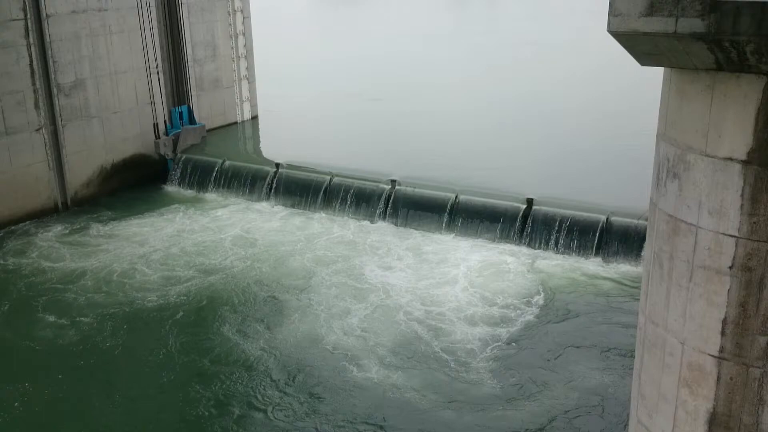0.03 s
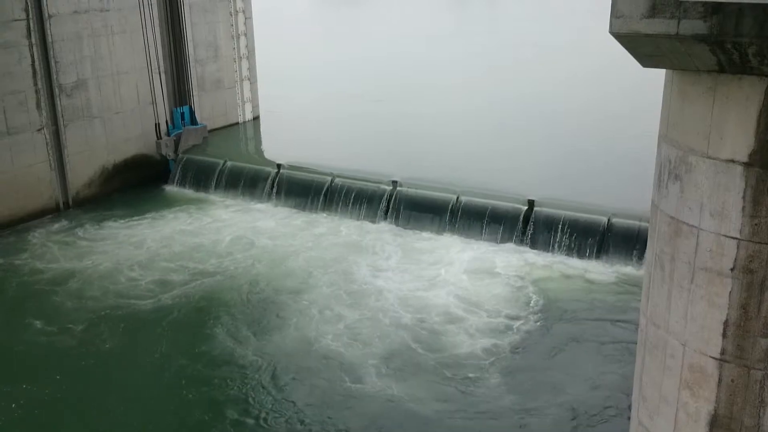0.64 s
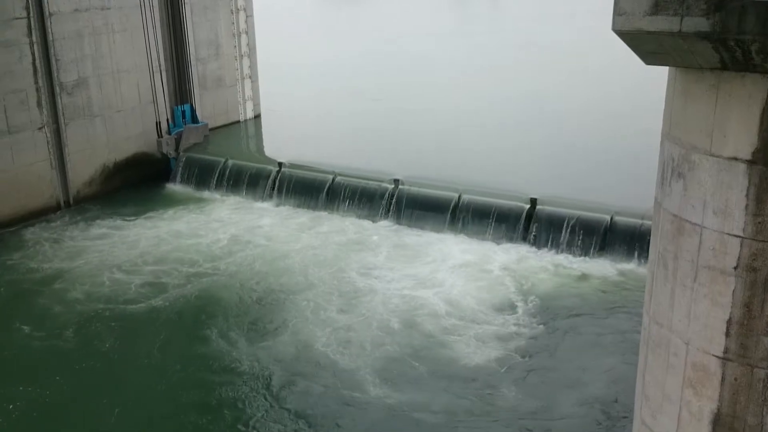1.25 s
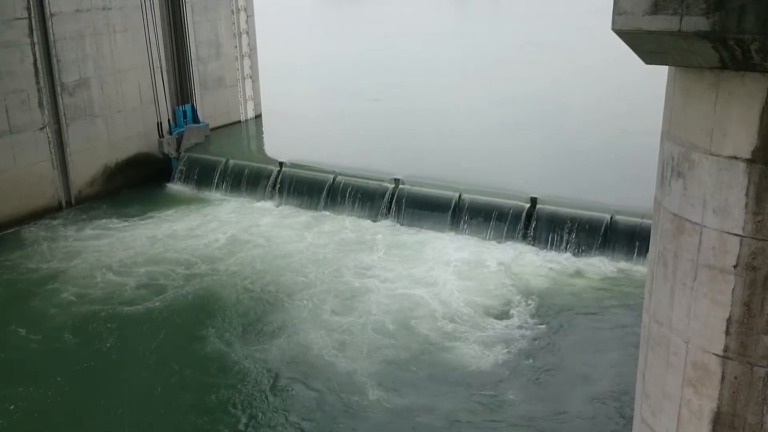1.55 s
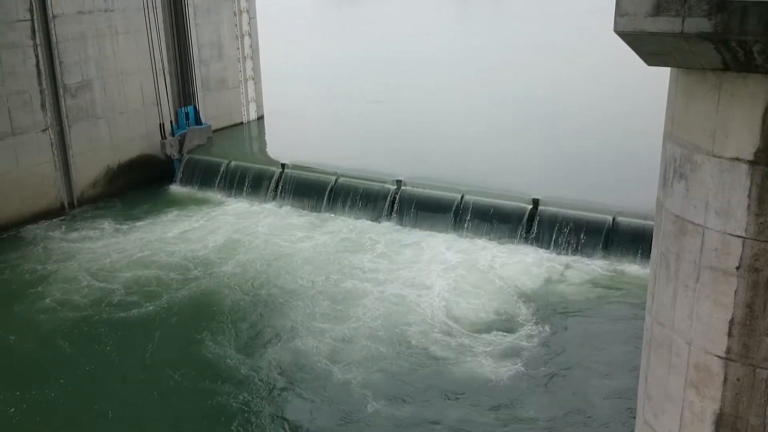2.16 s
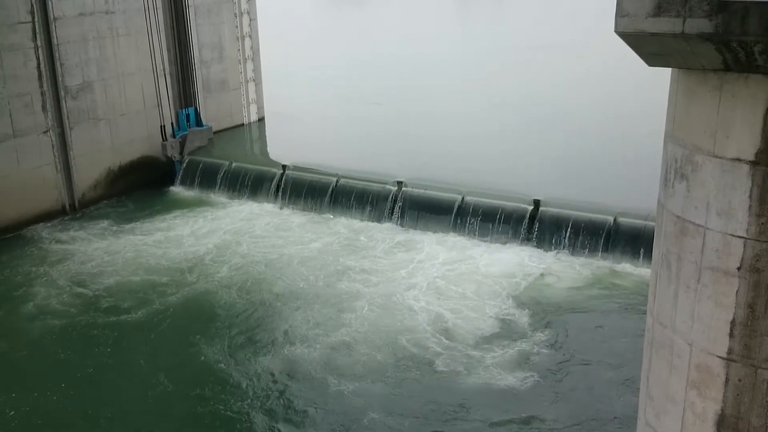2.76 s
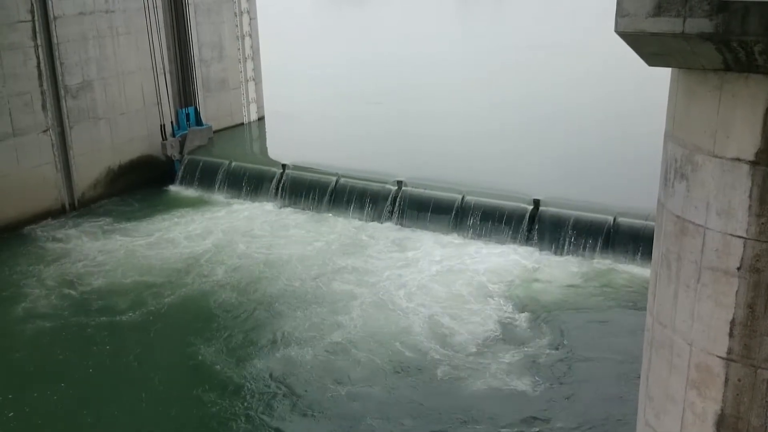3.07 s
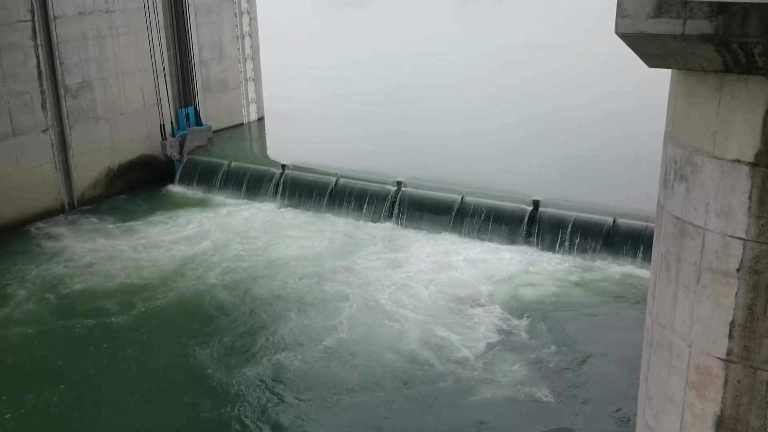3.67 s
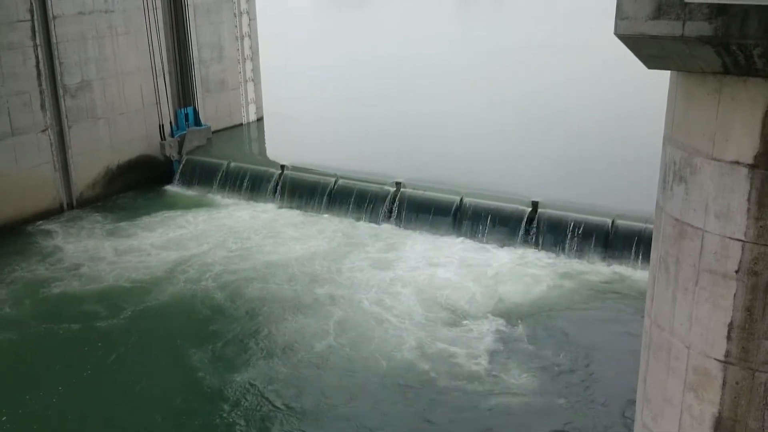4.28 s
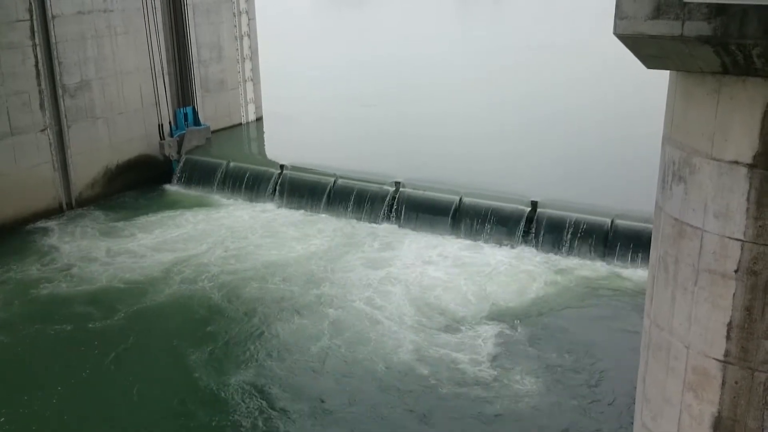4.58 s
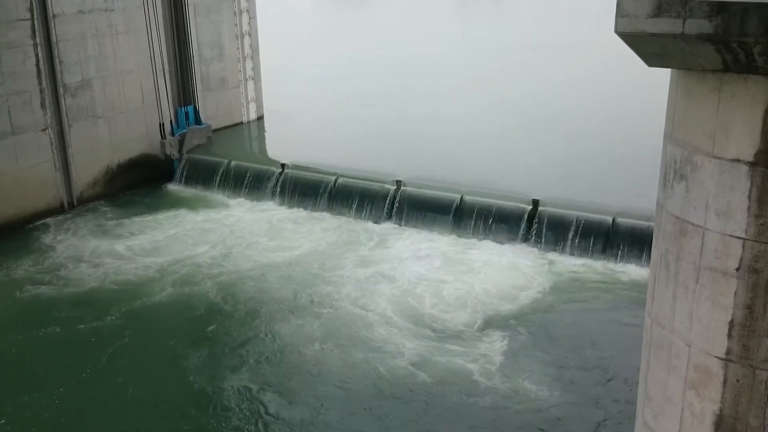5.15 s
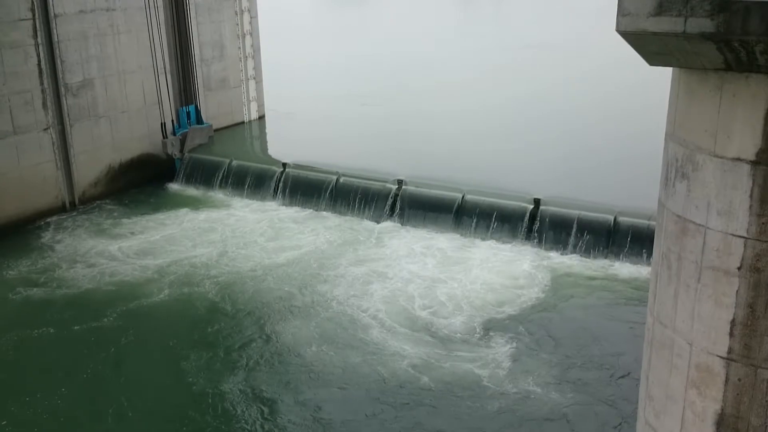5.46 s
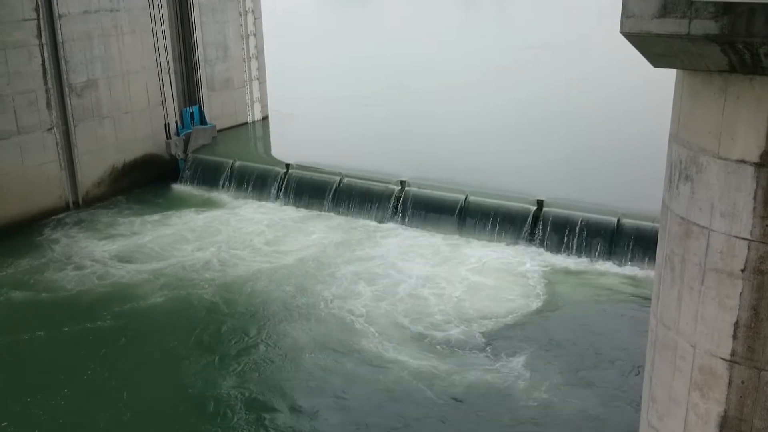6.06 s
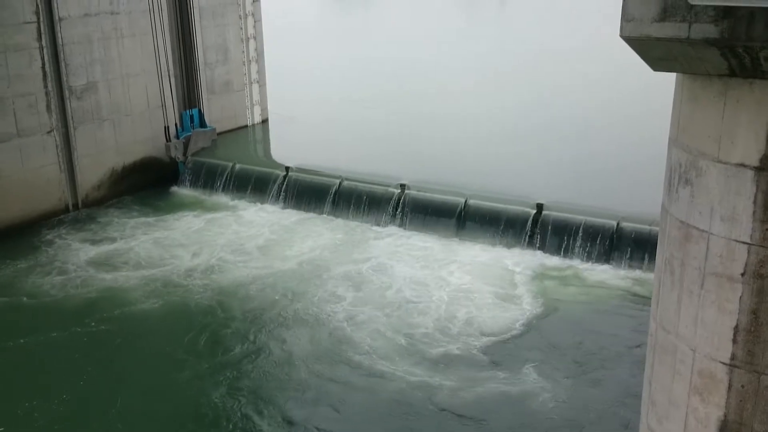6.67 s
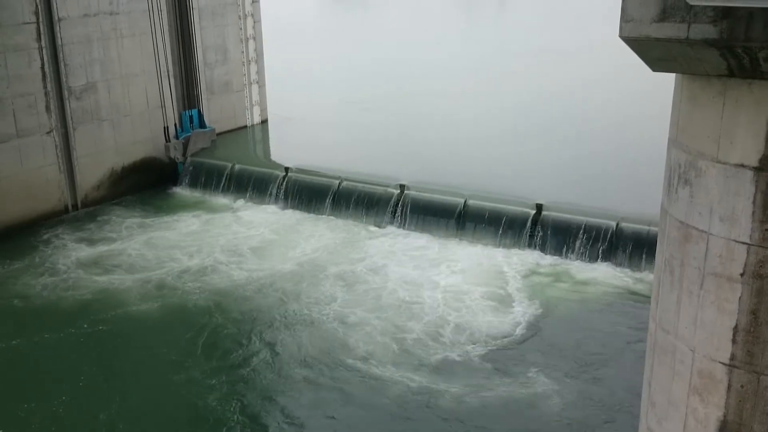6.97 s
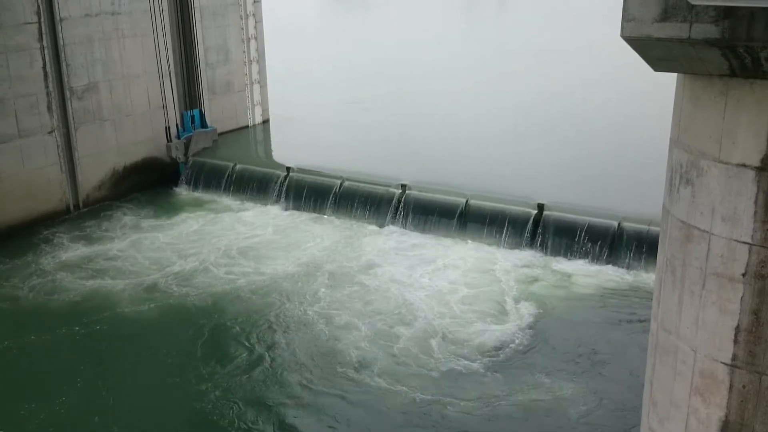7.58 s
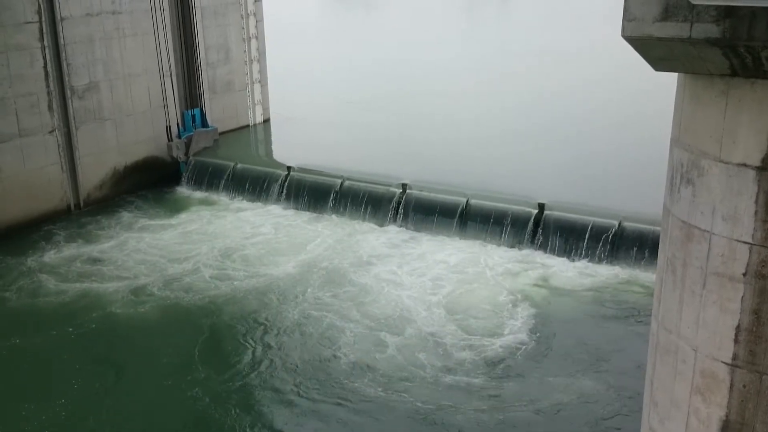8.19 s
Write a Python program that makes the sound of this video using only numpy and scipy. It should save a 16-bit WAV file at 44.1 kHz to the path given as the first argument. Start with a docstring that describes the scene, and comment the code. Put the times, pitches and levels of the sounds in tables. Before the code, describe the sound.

River water falling over a weir into a foaming pool fades in and carries on as a broad, even rush. It blends low churning, fine bubbling and a light hiss of spray, with a few small surges. Underneath, an unsteady low hum rises and sinks. The microphone is above the pool, giving a centred bass and a wide, slightly ringing hiss.

```python
"""A steady rush of water fades in: a river pours over a weir gate and churns in the pool below.
Clouds of trapped air rumble under the plunge, bubbles ring in the foam and spray hisses.
A low hum comes and goes. All is heard from above through two microphone ports that colour the treble."""
import sys
import numpy as np
from scipy import signal
from scipy.fft import rfft, irfft, next_fast_len
from scipy.io import wavfile

SR = 44100
rng = np.random.default_rng(int(sys.argv[2]) if len(sys.argv) > 2 else 0)


def wav_record(signal):
    """Record a signal, one row per channel, as 16-bit PCM in the file named by sys.argv[1]."""
    frames = np.transpose(np.atleast_2d(signal))
    bounded = np.clip(frames, -1, 1)
    # unit amplitude maps onto the largest positive 16-bit level
    quanta = np.round(bounded * 32767).astype(np.int16)
    wavfile.write(sys.argv[1], SR, quanta)


N = 367353
CUTOFF_HZ = 15800

# spectrum of the falling water: f/Hz, relative density/dB
WATER_SPECTRUM = [(22, -41), (45, -15), (56, -6.5), (80, -0.1), (140, -3.5), (180, -0.9), (300, 1.0),
                  (410, -2), (520, -7), (850, -5), (1300, -10), (2600, -12), (4200, -17.5), (11000, -27.5),
                  (16000, -31)]
# phase lead of the left port: f/Hz, phase/rad
LEFT_LEAD = [(40, 1), (100, .5), (380, 0), (550, -0.5), (850, 0), (1200, -2.0), (1600, -4), (2500, -5.5),
             (5500, -12.5), (9000, -21)]


def from_db(db):
    """Decibels to gain."""
    return 10 ** (np.asarray(db) / 20)


def unit_rms(x):
    """Scale to rms 1."""
    return x / np.sqrt(np.mean(x ** 2) + 1e-20)


def per_sample(points):
    """Read a (t/s, value) table at every sample."""
    return np.interp(np.arange(N) / SR, *np.transpose(points))


def at_hz(points, hz):
    """Read a (f/Hz, value) table on a log-frequency axis."""
    known_hz, values = np.transpose(points)
    return np.interp(np.log(hz + 1e-9), np.log(known_hz), values)


def filtered(x, response):
    """Apply the frequency response response(hz)."""
    size = next_fast_len(N + SR // 4, True)
    return irfft(rfft(x, size) * response(np.fft.rfftfreq(size, 1 / SR)), size)[..., :N]


def drift(per_s):
    """Random curve of rms 1 with per_s breakpoints a second."""
    steps = rng.standard_normal(2048)
    return unit_rms(np.interp(np.arange(N) / SR * per_s, np.arange(len(steps)), steps))


def diffuse_noise():
    """White noise from a wide pool at two close ports: bass alike, treble different."""
    # coherence of the ports: f/Hz, coherence/1
    coherence = [(30, 0.4), (80, 0.8), (190, 0.98), (400, 0.92), (590, 0.5), (800, 0.84), (1100, 0.25),
                 (2400, 0.13), (3400, 0.12), (5500, 0.08), (9000, .02)]
    left, independent = rng.standard_normal((2, N))
    shared = filtered(left, lambda hz: at_hz(coherence, hz) * np.exp(-1j * at_hz(LEFT_LEAD, hz)))
    right_only = filtered(independent, lambda hz: np.sqrt(1 - at_hz(coherence, hz) ** 2))
    return np.array([left, shared + right_only])


def hum(tone_hz=61.9, waver_hz=0.7, throb_db=1.0, rumble_db=-12, rumble_hz=44, width_oct=0.41):
    """Unsteady low tone, perhaps the gate trembling in the flow, over a rumble that swells with it."""
    # hum envelope: t/s, level/dB
    envelope = [(1.2, -42), (1.85, -37.3), (3.1, -44), (5.05, -41), (5.6, -50), (7.2, -56), (7.58, -38),
                (7.85, -49.5)]
    phase = 2 * np.pi * np.cumsum(tone_hz + waver_hz * drift(5.4)) / SR
    tone = np.sqrt(2) * np.sin([phase + at_hz(LEFT_LEAD, tone_hz), phase])
    tone *= from_db(throb_db * drift(8.7))
    rumble = filtered(diffuse_noise(),
                      lambda hz: np.exp(-(np.log2(hz / rumble_hz + 1e-9) / width_oct) ** 2))
    balance = from_db([[-3.0], [0.4]])   # left, right
    return (tone + from_db(rumble_db) * unit_rms(rumble)) * from_db(per_sample(envelope)) * balance


def bubbles(per_s=700, cycles_to_60db=10.6, spread_db=4.0, low_hz=450, high_hz=9000, sizes=28):
    """Single bubbles and drops near the surface ring briefly, scattered across the pool."""
    out = np.zeros((2, N))
    for hz in np.geomspace(low_hz, high_hz, sizes):
        draws = rng.random((3, 1500))
        wait, strength = -np.log(1 - draws[:2])   # exponential
        pan = draws[2]
        onsets = (np.cumsum(wait) * sizes / per_s * SR).astype(int)
        height = from_db(spread_db * np.minimum(strength, 4) + at_hz(WATER_SPECTRUM, hz)) * np.sqrt(hz)
        pops = np.zeros((2, N))
        pops[:, onsets[onsets < N]] = (height * np.sqrt([pan, 1 - pan]))[:, onsets < N]
        decay = np.exp(-np.log(1000) * hz / (cycles_to_60db * SR))
        step_rad = 2 * np.pi * hz / SR
        feedback = [1, -2 * decay * np.cos(step_rad), decay ** 2]
        out += signal.lfilter([0, np.sin(step_rad)], feedback, pops + 1e-18)
    return unit_rms(out)


def plunge(boom_heave_db=0.4, roar_heave_db=0.5, heaves_per_s=3.96, rise_share=0.4):
    """Level curves of the water's boom and roar in dB: random heave plus brief swells."""
    # brief swells: peak t/s, length/s, boom lift/dB, roar lift/dB
    swells = [(1.44, .15, 3.5, -2.5), (1.763, .2, 2.5, 4), (2.9, .9, 0, 1.5), (4.447, 0.14, 3, 3),
              (7.21, 0.22, 4.5, -1.5), (7.57, 0.18, 7, 1), (7.91, 0.14, 5, -1)]
    boom_db = boom_heave_db * drift(heaves_per_s)
    roar_db = roar_heave_db * drift(heaves_per_s)
    for peak_s, length_s, boom_lift_db, roar_lift_db in swells:
        from_peak = (np.arange(N) / SR - peak_s) / length_s
        swell = np.interp(from_peak, [-rise_share, 0, 1 - rise_share], [0, 1, 0])
        boom_db += boom_lift_db * swell
        roar_db += roar_lift_db * swell
    return boom_db, roar_db


def churn(swells_db, rush_db=-27.5, cloud_hz=400, heave_db=0.4, flicker_db=0.51, surge_db=0.07):
    """Countless bubbles merge into a rush; each octave is one bubble size and also swells on its own."""
    # centres of boom (big air clouds), roar (middling ones) and spray (small bubbles): f/Hz
    swell_hz = [125, 258, 800]
    noise = filtered(diffuse_noise(), lambda hz: from_db(at_hz(WATER_SPECTRUM, hz)) * (hz < CUTOFF_HZ))
    noise = unit_rms(noise)
    surge = drift(19)
    octaves_hz = np.geomspace(31.25, 16000, 10)
    out = np.zeros((2, N))
    for centre_hz, band_gains in zip(octaves_hz, np.eye(len(octaves_hz))):
        band = filtered(noise, lambda hz: at_hz(np.c_[octaves_hz, band_gains], hz))
        weights = [at_hz(np.c_[swell_hz, gains], centre_hz) for gains in np.eye(len(swell_hz))]
        swell_db = sum(weight * (db - db.mean()) for weight, db in zip(weights, swells_db))
        cloud_share = 1 / (1 + (centre_hz / cloud_hz) ** 2)   # clouds heave slowly, spray flickers fast
        slow_db = cloud_share * heave_db * drift(9.9)
        fast_db = (1 - cloud_share) * (flicker_db * drift(30) + surge_db * surge)
        out += band * from_db(rush_db + swell_db + slow_db + fast_db)
    return out


def scene(bubble_re_spray_db=-15):
    """The rush, the bubbles that stand out of it, and the hum."""
    # foam and spray on the pool: t/s, level/dB
    spray = [(1.5, -29), (2.45, -28.5), (3.3, -28.9), (5.5, -29), (8.3, -28.5)]
    spray_db = per_sample(spray)
    boom_db, roar_db = plunge()
    rush = churn([boom_db, roar_db, spray_db])
    return rush + from_db(spray_db + bubble_re_spray_db) * bubbles() + hum()


def colour(x, bands):
    """Peaking filters in series; each lifts or dips one band."""
    def response(hz):
        gain = 1
        for centre_hz, width_hz, gain_db in bands:
            bandpass = hz * width_hz / (hz * width_hz + 1j * (hz ** 2 - centre_hz ** 2))
            gain = gain * (1 + (from_db(gain_db) - 1) * bandpass)
        return gain
    return filtered(x, response)


def record(dry, fade_start_s=0.62, fade_length_s=0.59):
    """Treble peaks of the microphone ports, square-law fade-in, steep low-pass."""
    # colour of each side: f/Hz, width/Hz, gain/dB
    left_bands = [(5900, 760, 1.5), (7560, 800, 16), (9600, 710, 5), (12560, 2400, 6.5)]
    # same columns; the first row makes the right side slightly louder in the bass
    right_bands = [(60, 500, 1.5), (550, 210, -2), (1917, 130, 1.8), (4850, 752, 16.5), (6600, 660, 3),
                   (8500, 1700, -3.5), (13960, 1500, 13.5)]
    heard = np.array([colour(dry[0], left_bands), colour(dry[1], right_bands)])
    fade = np.clip((np.arange(N) / SR - fade_start_s) / fade_length_s, 0, 1) ** 2
    return filtered(heard * fade, lambda hz: 1 / np.sqrt(1 + (hz / CUTOFF_HZ) ** 600))


dry = scene()
out = record(dry)
wav_record(out)
```